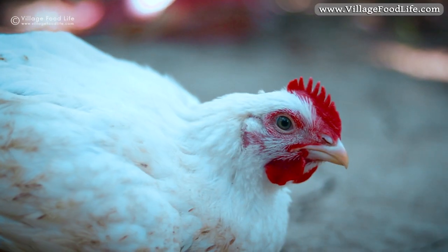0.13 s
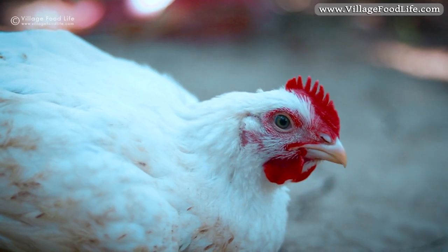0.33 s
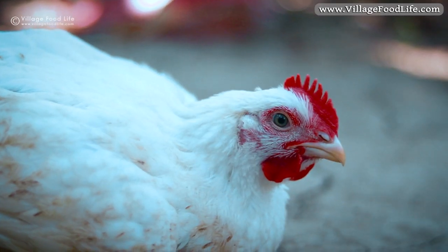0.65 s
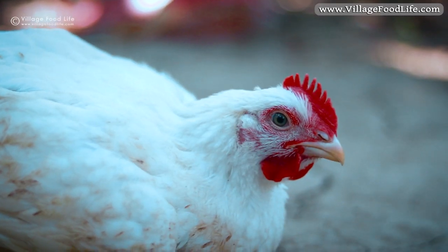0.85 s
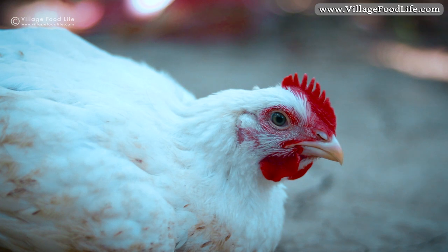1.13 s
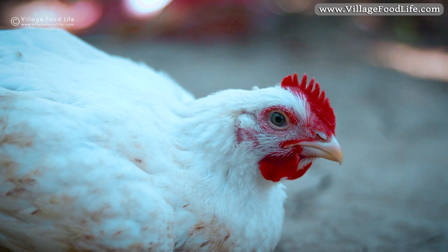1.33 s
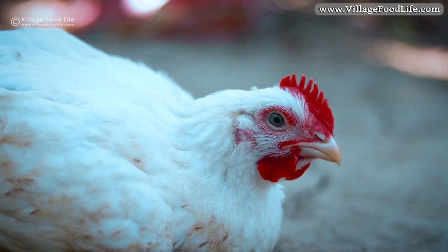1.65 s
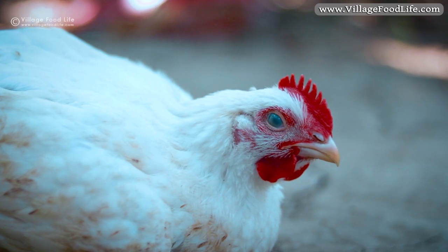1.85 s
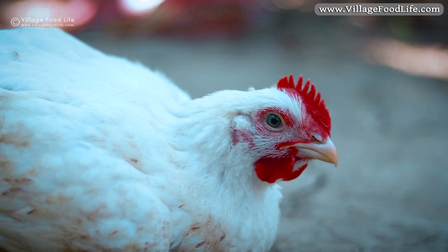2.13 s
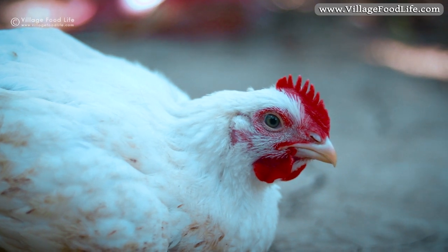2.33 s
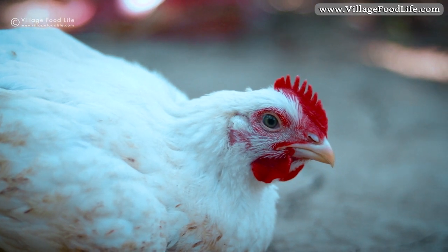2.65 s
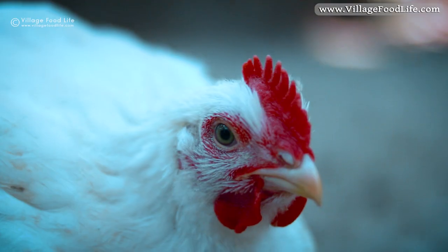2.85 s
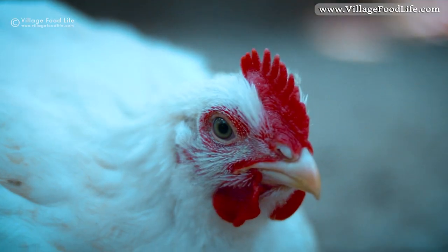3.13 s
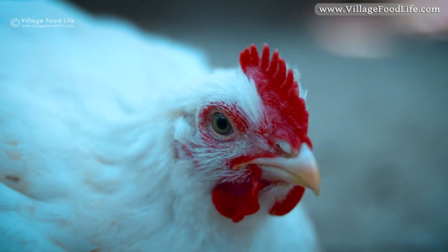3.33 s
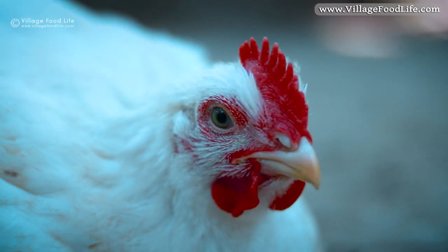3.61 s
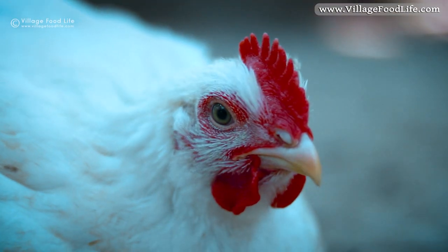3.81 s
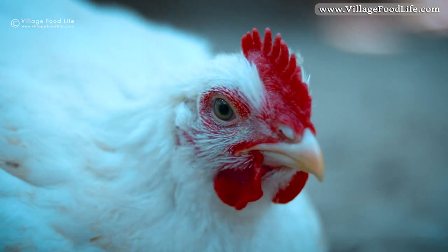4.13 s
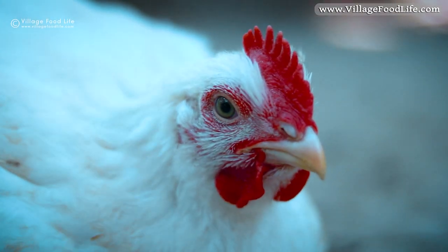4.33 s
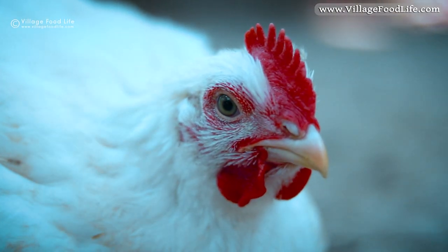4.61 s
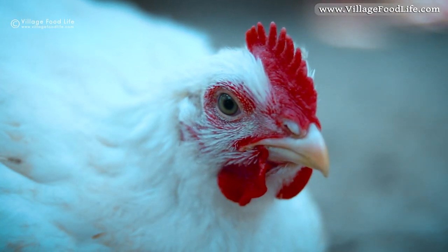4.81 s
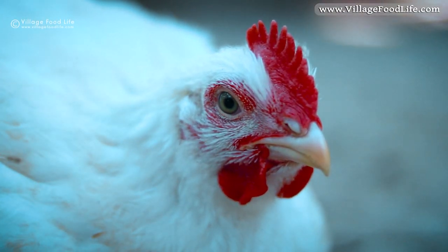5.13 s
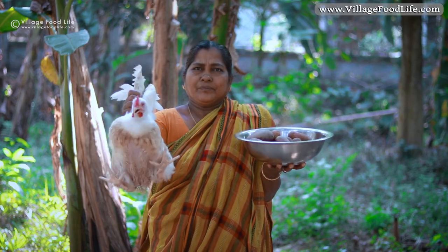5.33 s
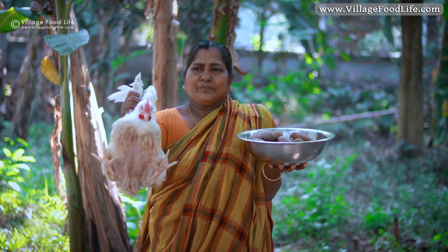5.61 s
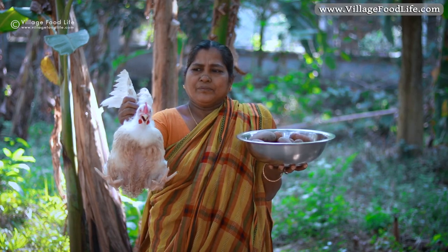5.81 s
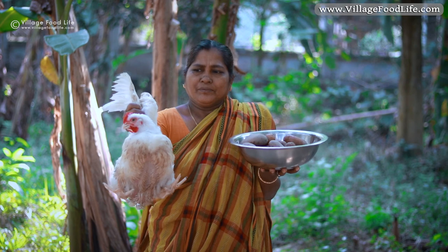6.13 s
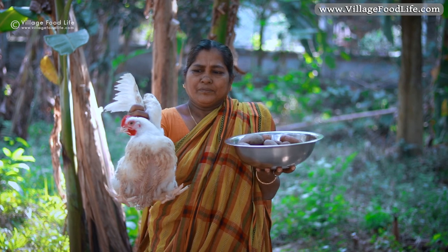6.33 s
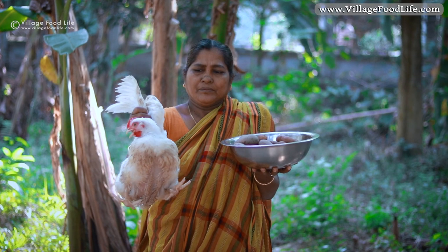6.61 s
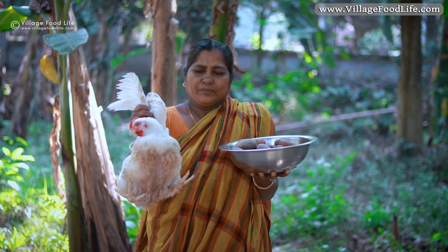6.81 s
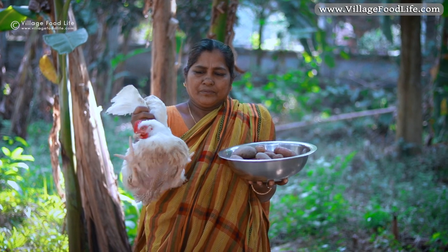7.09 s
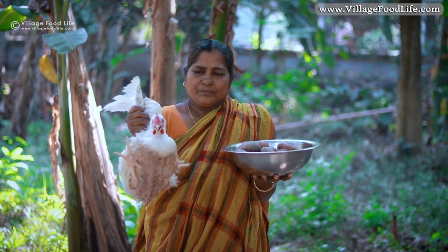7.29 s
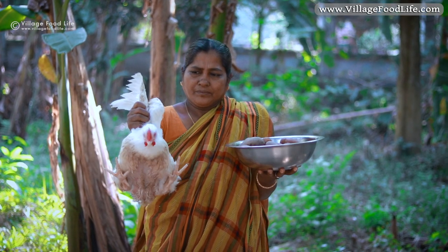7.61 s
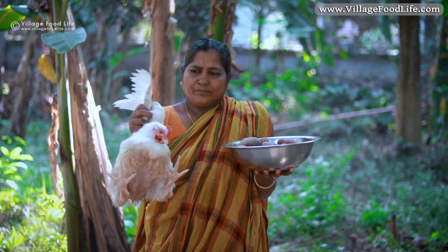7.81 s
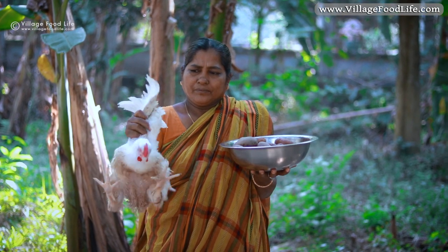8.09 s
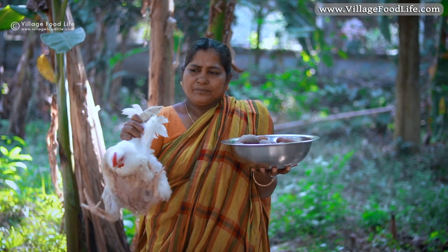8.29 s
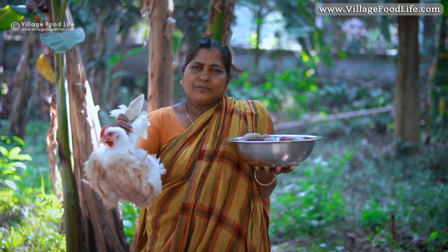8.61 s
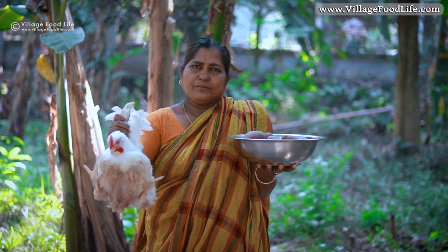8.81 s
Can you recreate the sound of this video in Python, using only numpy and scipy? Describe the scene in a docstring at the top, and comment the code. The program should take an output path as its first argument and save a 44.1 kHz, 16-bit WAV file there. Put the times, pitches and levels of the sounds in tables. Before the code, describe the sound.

Far-off knocking and thin insect shimmer in a calm yard give way to six loud, raspy squawks from a held chicken outdoors.

```python
"""A hen held by the wings squawks six times close to the microphones in a garden.
Each squawk starts as a strained shriek, breaks into a rasp and drops to a clear caw: partials of a
syrinx through a changing throat. The trees answer with a diffuse tail, and close bumps ring briefly.
Before that the yard is quiet: far knocks and clinks of ringing modes, a whirr of wings made of air pulses,
wavering sine hoots, and a blurred insect chorus over coloured noise; the chorus is fainter in the garden."""
import sys
import numpy as np
from scipy import signal
from scipy.fft import rfft, irfft, next_fast_len
from scipy.io import wavfile
from scipy.ndimage import uniform_filter1d, map_coordinates

SR = 44100
rng = np.random.default_rng(int(sys.argv[2]) if len(sys.argv) > 2 else 0)


def store_wav(level_fs):
    """Save 16-bit WAV to argv[1]."""
    pcm = np.round(np.clip(np.atleast_2d(level_fs), -1, 1) * 32767)
    wavfile.write(sys.argv[1], SR, pcm.T.astype(np.int16))


N = 394694  # samples
TOP_HZ = 15750  # band limit
SIDES = np.array([[.5], [-.5]])  # left, right: splits a difference evenly over the pair


def amp(db):
    """Decibels to gain."""
    return 10 ** (np.asarray(db) / 20)


def unit(x):
    """Scaled to rms 1."""
    return x / np.sqrt(np.mean(x ** 2) + 1e-20)


def along(points, hz):
    """(Hz, value) points read on a log axis."""
    f, v = np.transpose(points)
    return np.interp(np.log(hz + 1), np.log(f + 1), v)


def curves(rows, t):
    """Each column after the time, read at the times t."""
    s, *cols = np.transpose(rows)
    return [np.interp(t, s, c) for c in cols]


def step(t, s, width_s):
    """A smooth change from 0 to 1 around time s."""
    return .5 + .5 * np.tanh((t - s) / width_s)


def wobble(rate, size):
    """A smooth random curve, rate knots a second."""
    knots = rng.standard_normal(int(size * rate / SR) + 4)
    return map_coordinates(knots, [np.arange(size) * rate / SR])


def filtered(x, response):
    """x times a response of frequency."""
    n = x.shape[-1]
    m = next_fast_len(n + SR // 10)
    return irfft(rfft(x, m) * response(np.fft.rfftfreq(m, 1 / SR)), m)[..., :n]


def resonate(x, spectrum, size=2048):
    """x through a causal filter with this spectrum, built from its folded cepstrum."""
    cepstrum = irfft(np.log(amp(along(spectrum, np.fft.rfftfreq(size, 1 / SR)))))
    fold = np.r_[1, np.full(size // 2 - 1, 2), np.zeros(size // 2)]
    return signal.fftconvolve(x, irfft(np.exp(rfft(cepstrum * fold))))[:len(x)]


def steady(x, size=600):
    """x with its short-term rms held at 1."""
    power = uniform_filter1d(uniform_filter1d(x * x, size), size // 2)
    return x / np.sqrt(np.abs(power) + 1e-12)


def add(track, s, sound):
    """Mix a sound into the track at time s."""
    part = track[max(round(s * SR), 0):][:len(sound)]
    part += sound[:len(part)]


# Every squawk is a shriek, a rasp and a caw in one breath: row k of these tables belongs to squawk k.
# Depth is the weight of the two lowest partials.
# The strained opening. Each row: start in seconds, attack in seconds, level in dB, swell in dB,
# roughness 0-1, strain lost before the break 0-1, treble in dB, depth in dB.
SHRIEK_ROWS = [(5.233, 0.027, -29, 4, 0.78, 0.28, 3, -0.5), (5.723, 0.027, -31.5, -1, 0.63, .15, 10, -14.5),
               (6.521, 0.024, -31.5, 7.5, 0.72, 0, 4, -2.5), (7.248, 0.027, -33.5, 11, 0.49, 0, 7, 4.5),
               (7.947, 0.04, -35.5, 0.5, .58, 0.16, 4, 5.5),
               (8.431, 0.0068, -27.5, 5.5, 0.7, 0.02, 0.5, -24)]
# Each shriek locks into a clear tone for a moment.
# Each row: middle in seconds, half length in seconds, gain in dB.
LOCK_ROWS = [(5.268, .022, -1.5), (5.794, 0.025, 9.5), (6.651, 0.039, -0.5), (7.312, 0.048, 3),
             (7.967, 0.014, 1.5), (8.469, 0.013, 4)]
# The broken middle. Each row: start in seconds, time the break takes in seconds, level in dB,
# roughness 0-1, strain 0-1, treble in dB, depth in dB.
RASP_ROWS = [(5.318, 0.0044, -27, 0.54, 0.18, 2, 0.5), (5.853, 0.023, -21.5, 0.69, 0.3, 6.5, -2),
             (6.722, 0.0084, -23.5, 0.58, 0.67, -4, -4.5), (7.414, 0.0046, -22.5, 0.5, 0.31, 10.5, 2.5),
             (8.067, 0.01, -24, 0.61, 0.57, -4, -8), (8.535, 0.018, -25, 0.54, 0.64, -0.5, -6)]
# The clear end. Each row: start, end and release in seconds, level in dB, roughness 0-1,
# treble in dB, depth in dB, mouth resonance in Hz.
CAW_ROWS = [(5.406, 5.472, 0.0074, -25.5, 0.03, 5, -2.5, 2800),
            (5.889, 5.965, 0.024, -24.5, 0.08, 0, -9, 2870),
            (6.775, 6.816, 0.016, -26.5, 0.15, 1, -3.5, 2270),
            (7.446, 7.563, .014, -25, 0.06, 9.5, -2.5, 3100),
            (8.13, 8.236, 0.0342, -27.5, 0.43, 1, -0.5, 2480),
            (8.589, 8.669, 0.028, -27, 0.13, 7, -5, 2270)]
# Pitch contour of each squawk. Each point: time in seconds, pitch in Hz.
PITCH_CONTOURS = [
    [(5.235, 953), (5.25, 823.6), (5.27, 853.6), (5.30, 803), (5.325, 866), (5.35, 728), (5.366, 739),
     (5.38, 632), (5.41, 574.6)],
    [(5.72, 559), (5.745, 667), (5.77, 718.4), (5.79, 819), (5.825, 710), (5.86, 796.4), (5.88, 625),
     (5.90, 555), (5.93, 574.3)],
    [(6.53, 580), (6.61, 621.6), (6.628, 752.3), (6.67, 738.4), (6.70, 692.6), (6.716, 576), (6.733, 802),
     (6.77, 689.7), (6.781, 533)],
    [(7.25, 570.7), (7.313, 754), (7.335, 712.5), (7.353, 799.4), (7.398, 760), (7.412, 600), (7.42, 793),
     (7.432, 638), (7.447, 592)],
    [(7.95, 777), (7.972, 853.5), (8.02, 533.5), (8.045, 533.7), (8.054, 782), (8.11, 790.4), (8.13, 572),
     (8.17, 589), (8.20, 537.6)],
    [(8.435, 632.6), (8.46, 544.5), (8.473, 615.5), (8.495, 725.7), (8.523, 721), (8.542, 865.5),
     (8.57, 738), (8.59, 575.5), (8.625, 557.6)],
]
# The treble beams from the beak, so it differs as the head turns.
# Each row: dB around 4 kHz, dB above 10 kHz.
HEAD_TURNS = [(2, 3.5), (0, 6.5), (-8, -8.5), (2.5, 3), (1.5, -0.5), (-0.5, -1)]
# The hen across the microphone pair. Each row: frequency in Hz, left over right in dB.
HEN_LEFT_OVER_RIGHT = [(60, -1), (110, 1.0), (200, -11), (380, 4), (700, 1.5), (1290, 0), (2380, -3),
                       (4400, 1), (8120, 0.5), (15000, 4.5)]


def hen(lead_s=.000015):
    """All squawks, beamed by the beak, reach the pair from nearly straight ahead."""
    track = whistles()
    rows = zip(HEAD_TURNS, SHRIEK_ROWS, LOCK_ROWS, RASP_ROWS, CAW_ROWS, PITCH_CONTOURS)
    for (presence_db, sizzle_db), shriek, *rest in rows:
        def beam(hz):
            presence = presence_db * np.exp(-((hz - 4300) / 1100) ** 2)
            sizzle = sizzle_db / (1 + (10500 / (hz + 1)) ** 12)
            return amp(presence + sizzle)

        voice = squawk(*gesture(shriek, *rest))
        add(track, shriek[0], filtered(voice, beam))

    def to_pair(hz):
        return amp(SIDES * along(HEN_LEFT_OVER_RIGHT, hz)) * np.exp(2j * np.pi * hz * SIDES * lead_s)

    return filtered(track, to_pair)


SHRIEK_STRAIN = 0.97  # 0-1
SETTLE_S = 0.0058  # how fast the rasp settles into the caw
DIP_DB = 2.5  # the voice weakens as it drops into the caw
LOCK_CLEARS = 0.73  # share of the roughness that a full lock removes
LOCK_DULLS = 1.55  # dB of treble lost per dB that the locked tone gains
SAG_HZ_PER_S, DROOP_HZ = 138, 55  # the held caw sinks slowly, then droops with the last air
CLOSE_S, CLOSE_DB, DEEPEN_DB = 0.037, 8.5, 12  # the closing beak muffles and deepens the end
OPEN_S, OPEN_DB = 0.011, 21  # the opening beak lets the treble out late


def gesture(shriek, lock, rasp, caw, contour):
    """The controls of one squawk as breath, strain and beak pass through its three registers."""
    (start, attack_s, shriek_db, swell_db, shriek_rough, loosening,
     shriek_treble_db, shriek_depth_db) = shriek
    lock_at, lock_s, lock_db = lock
    rasp_at, break_s, rasp_db, rasp_rough, rasp_strain, rasp_treble_db, rasp_depth_db = rasp
    caw_at, end, release_s, caw_db, caw_rough, caw_treble_db, caw_depth_db, mouth_hz = caw
    t = np.arange(start, end, 1 / SR)
    broken, settled = step(t, rasp_at, break_s), step(t, caw_at, SETTLE_S)

    def blend(a, b, c):
        return a + (b - a) * broken + (c - b) * settled

    progress = np.minimum((t - start) / (rasp_at - start), 1)
    locked = np.exp(-((t - lock_at) / lock_s) ** 2)
    attack = np.clip((t - start) / attack_s, 0, 1)
    release = np.clip((end - t) / release_s, 0, 1)
    opening, closing = np.exp((start - t) / OPEN_S), np.exp((t - end) / CLOSE_S)

    swelling_db = shriek_db + swell_db * (progress - .5) + lock_db * locked
    db = blend(swelling_db, rasp_db, caw_db) - DIP_DB * np.sin(np.pi * settled)
    sag = SAG_HZ_PER_S * np.maximum(t - contour[-1][0], 0)
    pitch = curves(contour, t)[0] - sag - DROOP_HZ * (1 - release)
    rough = blend(shriek_rough * (1 - LOCK_CLEARS * locked), rasp_rough, caw_rough)
    strain = blend(SHRIEK_STRAIN - loosening * progress ** 2 * (1 - locked), rasp_strain, 0)
    treble_db = blend(shriek_treble_db - LOCK_DULLS * lock_db * locked, rasp_treble_db, caw_treble_db)
    treble_db = treble_db - OPEN_DB * opening - CLOSE_DB * closing
    depth_db = blend(shriek_depth_db, rasp_depth_db, caw_depth_db) + DEEPEN_DB * closing
    return pitch, amp(db) * attack * release, rough, strain, treble_db, depth_db, mouth_hz


# The throat strained, half open and relaxed. Each row: frequency in Hz, level in dB.
STRAINED_THROAT = [(450, -32), (800, -18), (1100, -9), (1500, -9), (1900, -4), (2400, 2.5), (3100, -2.5),
                   (3600, -3), (4800, -14.5), (6400, -4), (8000, -9.5), (10000, -19), (14000, -27),
                   (16000, -37)]
HALF_OPEN_THROAT = [(400, -30), (750, 0), (1050, -16.5), (1550, 5.5), (1900, 6.5), (2300, 2.5),
                    (3100, -4.5), (4700, -11), (7000, -10.5), (10000, -26), (15000, -43)]
RELAXED_THROAT = [(300, -24), (560, -13.5), (750, -1.5), (900, -17), (1130, 1), (1700, 3), (2250, -16),
                  (2850, -9), (3450, -11), (4000, -11), (4700, -14.5), (5800, -19), (6900, -12.5),
                  (9000, -22.5), (10500, -36), (15000, -46)]
MOUTH_DB, MOUTH_WIDTH_HZ = 5.5, 260  # strength with no strain and width of the mouth resonance


def squawk(pitch, gain, rough, strain, treble_db, depth_db, mouth_hz, whistle_db=6, sputter_db=1.47):
    """The syrinx sounds through a throat that opens as the strain lets go."""
    rough, strain = np.clip(rough, 0, 1), np.clip(strain, 0, 1)
    source = syrinx(pitch, rough, strain, depth_db, whistle_db)
    voice = np.zeros(len(pitch))
    for shape, at in [(RELAXED_THROAT, 0), (HALF_OPEN_THROAT, .5), (STRAINED_THROAT, 1)]:
        share = np.maximum(1 - 2 * abs(strain - at), 0)
        voice += share * steady(resonate(source, shape))
    mouth = filtered(voice, lambda hz: np.exp(-((hz - mouth_hz) / MOUTH_WIDTH_HZ) ** 2))
    voice = voice + (amp(MOUTH_DB * (1 - strain)) - 1) * mouth
    treble = filtered(voice, lambda hz: 1 / (1 + (4500 / (hz + 1)) ** 8))
    voice = steady(voice + (amp(treble_db) - 1) * treble)
    sputter = amp(sputter_db * np.sqrt(rough) * wobble(293, len(pitch)))
    return voice * sputter * gain


def syrinx(pitch, rough, strain, depth_db, whistle_db, count=32):
    """Partials of the vibrating membranes, torn apart as the vibration turns chaotic."""
    n = len(pitch)
    jitter = .0012 * wobble(90, n) + rough * (.02 * wobble(130, n) + .012 * wobble(900, n))
    phase = 2 * np.pi * np.cumsum(pitch * (1 + jitter)) / SR
    tone = np.zeros(n)
    for k in range(1, count + 1):
        # each partial slips and flickers on its own, the high ones most
        looseness = .32 * rough ** 1.3 * k ** 1.5 + .2 * strain * max(k - 4, 0)
        slip = np.minimum(looseness, 3) * wobble(380, n)
        flicker = amp(7 * rough * wobble(110, n) + min(k / 4, 3) * wobble(9, n))
        # strain flips the voice an octave up: odd partials fade and one whistle stands out
        gain = 1 - strain ** 4 * (1 - rough ** 2) if k % 2 else 1
        gain = gain * amp(whistle_db * strain * (1 - rough) * (k == 4) + depth_db * (k <= 2))
        tone += gain * flicker * np.cos(k * phase + slip) * (k * pitch < TOP_HZ)
    # strong and weak cycles alternate in rough stretches
    alternation = .7 * rough * (1 - strain ** 4) * wobble(80, n) * np.cos(phase / 2)
    tone = steady(tone * (1 + alternation))
    breath = unit(rng.standard_normal(n) * (2 + np.cos(phase)))
    breath_share = .001 + .4 * rough ** 3 + .08 * strain * rough
    return np.sqrt(1 - breath_share) * tone + np.sqrt(breath_share) * breath


# Thin high whistles over parts of the squawks.
# Each row: start in seconds, length in seconds, first pitch in Hz, last pitch in Hz, level in dB.
WHISTLE_GLIDES = [(5.25, 0.0375, 7050, 6800, -34), (5.718, 0.023, 3600, 5440, -47),
                  (7.334, 0.064, 6270, 5940, -35), (7.962, 0.0364, 7000, 6100, -40.5),
                  (7.995, 0.089, 5400, 5200, -37), (8.439, 0.05, 3750, 4960, -36)]


def whistles(waver_hz=130):
    """Thin, wavering high whistles that glide over parts of the squawks."""
    track = np.zeros(N)
    for s, length, first_hz, last_hz, db in WHISTLE_GLIDES:
        n = int(length * SR)
        pitch = np.linspace(first_hz, last_hz, n) + waver_hz * wobble(250, n)
        tone = np.sin(2 * np.pi * np.cumsum(pitch) / SR)
        flutter = amp(2.8 * wobble(250, n))
        add(track, s, amp(db) * unit(tone * flutter * signal.windows.tukey(n, .5)))
    return track


def nearby(x, span_s=0.0099):
    """Wings, body and other close surfaces scatter the treble within a few milliseconds."""
    t = np.arange(SR // 20) / SR
    burst = rng.standard_normal((2, len(t))) * np.exp(-t / span_s)
    echo = signal.fftconvolve(x, burst / np.linalg.norm(burst[0]), axes=1)[:, :N]
    return filtered(echo, lambda hz: hz / (hz + 3000))


# How long the trees ring on. Each row: frequency in Hz, t60 in seconds.
TREE_DECAY = [(200, 0.51), (1200, 0.72), (3000, 0.61), (7000, 0.73), (14000, 0.26)]


def trees(x, delay_s=.012):
    """Trunks and leaves scatter a diffuse tail to each side."""
    hz, t, z = signal.stft(rng.standard_normal((2, SR)), SR, nperseg=256)
    decay = amp(-60 * t / along(TREE_DECAY, hz)[:, None])
    tail = signal.istft(z * decay, SR, nperseg=256)[1]
    tail = np.pad(tail / np.linalg.norm(tail[0]), ((0, 0), (int(delay_s * SR), 0)))
    return signal.fftconvolve(np.atleast_2d(x), tail, axes=1)[:, :N]


def strikes(events, modes, attack_s, scuff_db, scuff_t60, blur):
    """Each blow rings the modes over a short scuff of noise."""
    track, t = np.zeros(N), np.arange(SR // 2) / SR
    scuff_colour = [(150, -32), (500, 1.0), (2200, 8), (4000, -21), (12000, -51)]  # (Hz, dB)
    for s, db in events:
        ring = np.zeros(len(t))
        for hz, level, t60 in modes:
            decay = amp(level + rng.normal(0, 1) - 60 * t / t60)
            ring += decay * np.sin(2 * np.pi * hz * t + blur * wobble(127, len(t)))
        scuff = unit(resonate(rng.standard_normal(len(t)), scuff_colour))
        scuff = scuff * amp(scuff_db - 60 * t / scuff_t60)
        add(track, s, amp(db) * (ring + scuff) * (1 - np.exp(-t / attack_s)))
    return track


# Bumps close to the microphones. Each row: start in seconds, level in dB.
BUMP_TIMES = [(5.423, -28), (5.725, -51), (8.11, -58), (8.19, -42)]
# What a bump rings with. Each row: frequency in Hz, level in dB, t60 in seconds.
BUMP_RING = [(257, -13.5, 0.2), (374, 5, 0.039), (534, -2, 0.034)]


def bumps():
    """Close, dull blows ring a few low modes."""
    return strikes(BUMP_TIMES, BUMP_RING, attack_s=0.001, scuff_db=0, scuff_t60=0.044, blur=1.0)


# A far knock followed by two clinks is heard three times.
# Each row: time of the knock in seconds, level in dB.
KNOCK_TIMES = [(0.03, -38.5), (1.591, -38.5), (3.991, -38)]


def repeats(pattern):
    """The pattern of blows around each of the knock times: (s, level dB)."""
    return [(s + after, knock_db + db) for s, knock_db in KNOCK_TIMES for after, db in pattern]


# Touch, blow and rebound. Each row: seconds after the knock, dB against its listed level.
KNOCK_BLOWS = [(-.014, -9), (0, 2.5), (.035, -9.5)]
# What the far knock rings with. Each row: frequency in Hz, level in dB, t60 in seconds.
KNOCK_RING = [(398, 5.5, 0.03), (734, 11, 0.024), (1260, -9, 0.087), (1474, -5, 0.2), (2157, 2.5, 0.25),
              (2190, 0.5, 0.15), (2244, -3.5, 0.22), (1940, -5, 0.14), (2505, -6, 0.18), (2940, -7, 0.35)]


def knocks():
    """A touch, a blow and a rebound set the same modes ringing."""
    return strikes(repeats(KNOCK_BLOWS), KNOCK_RING,
                   attack_s=0.0031, scuff_db=-4, scuff_t60=0.1, blur=0.87)


# The two clinks. Each row: seconds after the knock, dB against its listed level.
CLINK_BLOWS = [(.618, -10.5), (.755, -3.5)]
# What a far clink rings with. Each row: frequency in Hz, level in dB, t60 in seconds.
CLINK_RING = [(813, -4, 0.14), (1474, -1.5, 0.21), (2537, 4.5, 0.11), (2850, -9, 0.36)]


def clinks():
    """Two sharper blows ring a few modes of their own."""
    return strikes(repeats(CLINK_BLOWS), CLINK_RING,
                   attack_s=0.00069, scuff_db=1.0, scuff_t60=0.037, blur=1.0)


# A dry rustle trails the knock and the second clink.
# Each row: middle in seconds after the knock, length in seconds, dB against the knock's listed level.
RUSTLE_SWELLS = [(0.053, 0.14, -15.5), (0.804, 0.1, -12.5)]
# Colour of the rustle. Each row: frequency in Hz, level in dB.
RUSTLE_SPECTRUM = [(300, -17), (1000, 4.5), (3000, 8), (6000, 3), (11000, -3), (16000, -16)]


def rustles():
    """Brief swells of crisp, grainy noise."""
    t = np.arange(N) / SR
    swell = np.zeros(N)
    for s, knock_db in KNOCK_TIMES:
        for after, length, db in RUSTLE_SWELLS:
            swell += amp(knock_db + db) * np.exp(-2 * ((t - s - after) / length) ** 2)
    grains = rng.standard_normal((2, N)) * amp(1.7 * wobble(400, N))
    return swell * unit(filtered(grains, lambda hz: amp(along(RUSTLE_SPECTRUM, hz))))


# Colour of the feathers' swish. Each row: frequency in Hz, level in dB.
FEATHER_SPECTRUM = [(60, 9), (200, 4), (700, 0.5), (1300, -7), (2400, -2.5), (3500, -22), (12000, -37.5)]
WHIRR_S, WINGBEAT_S, WINGBEAT_DB = 2.856, .0395, -36  # first beat, time between beats, gain


def wings(push_s=0.0019, swish_s=0.02, swish_db=-13, count=5):
    """Each wingbeat pushes and pulls the air once while the feathers swish."""
    t = np.arange(N) / SR
    feathers = unit(filtered(rng.standard_normal(N), lambda hz: amp(along(FEATHER_SPECTRUM, hz))))
    track = np.zeros(N)
    for s in WHIRR_S + WINGBEAT_S * np.arange(count):
        u = (t - s) / push_s - 1
        push = -2 * u * np.exp(-u * u)
        swish = amp(swish_db) * feathers * np.exp(-((t - s - .008) / swish_s) ** 2)
        track += amp(WINGBEAT_DB) * (push + swish)
    return track


# Distant hoots and thin insect notes.
# Each row: start in seconds, length in seconds, pitch in Hz, level in dB.
FAR_NOTES = [(0.946, 0.11, 668, -64.5), (2.5, .12, 668, -63.5), (3.067, 0.059, 1006, -55),
             (3.137, 0.11, 990, -52.5), (3.13, 0.14, 474, -61), (4.893, 0.14, 668, -66),
             (6.27, .11, 8640, -65), (8.349, 0.085, 8640, -54)]


def notes():
    """Nearly pure, slightly wavering far calls."""
    track = np.zeros(N)
    for s, length, hz, db in FAR_NOTES:
        n = int(length * SR)
        phase = 2 * np.pi * np.cumsum(hz + 8 * wobble(68.0, n)) / SR
        waver = amp(2.2 * wobble(50, n))
        add(track, s, amp(db) * waver * unit(np.sin(phase) * signal.windows.tukey(n, .5)))
    return track


# The insect chorus swells slowly and drops back fast. Each row: crest in seconds, effort 0-1.
CHORUS_SWELLS = [(.75, 1), (1.4, 0.3), (2.3, 0.85), (3.35, .8), (4.7, 0.85)]
SWELL_S, RELAX_S = .4, .15
CHORUS_HZ, EFFORT_HZ = 4660, 330  # pitch at rest, rise at full effort
CHORUS_DB, EFFORT_DB = -62.5, 4  # gain at rest, rise at full effort
GARDEN_S, SHELTER_DB = 5.1, 7  # the chorus is fainter in the garden


def insects(width_hz=650, upper_db=-12):
    """A chorus of many insects blurs into a drifting band with a weaker one above it."""
    t = np.arange(N) / SR
    effort = np.zeros(N)
    for s, size in CHORUS_SWELLS:
        effort += size * np.exp(-((t - s) / np.where(t < s, SWELL_S, RELAX_S)) ** 2)
    phase = 2 * np.pi * np.cumsum(CHORUS_HZ + EFFORT_HZ * effort) / SR
    db = CHORUS_DB + EFFORT_DB * effort - SHELTER_DB * step(t, GARDEN_S, RELAX_S)

    def band(p, width):
        return unit(wobble(width, N) * np.cos(p) + wobble(width, N) * np.sin(p))

    pair = []
    for side in range(2):
        main = band(phase, width_hz) + .5 * band(phase, 2 * width_hz)
        pair.append(main + amp(upper_db) * band(1.85 * phase, 2 * width_hz))
    return amp(db) * np.array(pair)


# Level of the air in each place. Each row: time in seconds, yard in dB, garden in dB.
AIR_LEVELS = [(0, -52, -102), (5.2, -52.5, -70), (5.7, -65, -58), (8.95, -78, -58.5)]
# Colour of the air in the yard, then in the garden. Each row: frequency in Hz, level in dB.
YARD_SPECTRUM = [(25, -13), (53, -4.5), (110, -3.5), (170, -2), (300, -9), (780, -11.5), (1300, -14.5),
                 (3500, -18.5), (6000, -21.5), (7800, -24), (9000, -21), (11000, -28.5), (15500, -31)]
GARDEN_SPECTRUM = [(25, -24), (60, 1), (100, 1.5), (170, -8.5), (350, -6.5), (700, -11), (2000, -10.5),
                   (5000, -15.5), (9000, -19.5), (15500, -33)]


def air():
    """The hum of the open yard, as coloured noise, gives way to the stiller garden."""
    yard_db, garden_db = curves(AIR_LEVELS, np.arange(N) / SR)
    drift = amp(0.057 * wobble(6, N))
    return drift * (amp(yard_db) * murmur(YARD_SPECTRUM) + amp(garden_db) * murmur(GARDEN_SPECTRUM))


# How alike the air is at the two microphones. Each row: frequency in Hz, left-right likeness 0-1.
AIR_LIKENESS = [(60, 0.84), (130, 0.75), (300, 0.4), (640, 0.34), (1400, 0.011)]


def murmur(colour):
    """Stereo noise, alike on both sides only in the bass."""
    def mid_side(hz):
        turn = np.arccos(np.clip(along(AIR_LIKENESS, hz), -1, 1)) / 2
        return amp(along(colour, hz)) * np.array([np.cos(turn), np.sin(turn)])

    mid, side = filtered(rng.standard_normal((2, N)), mid_side)
    return unit(np.array([mid + side, mid - side]))


def scene(far_left_db=4, far_lead_s=0.000163):
    """The hen close by; the earlier yard sounds lean left."""
    bird = hen()
    far = knocks() + clinks() + notes()

    def to_left(hz):
        return amp(far_left_db * SIDES) * np.exp(2j * np.pi * hz * SIDES * far_lead_s)

    background = filtered(far, to_left) + amp(-9.5) * trees(far)
    background = background + wings() + rustles() + insects() + air()
    close = bird + amp(-7) * nearby(bird) + bumps()
    return close + amp(-12.5) * trees(bird) + background * amp(1.47 * SIDES)  # a further lean left


def record(dry):
    """Nothing is kept above the band limit."""
    return filtered(dry, lambda hz: hz < TOP_HZ)


dry = scene()
out = record(dry)
store_wav(out)
```